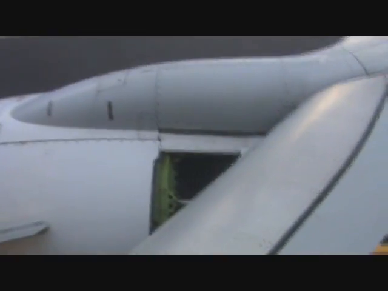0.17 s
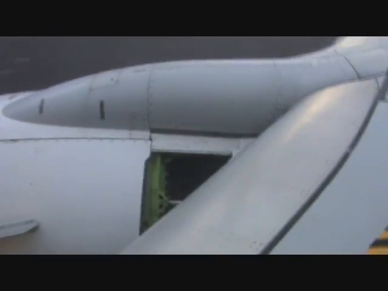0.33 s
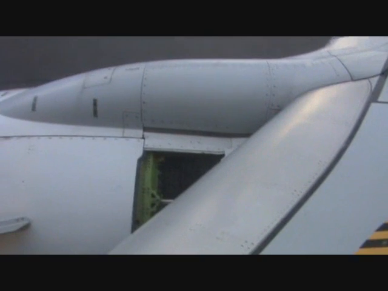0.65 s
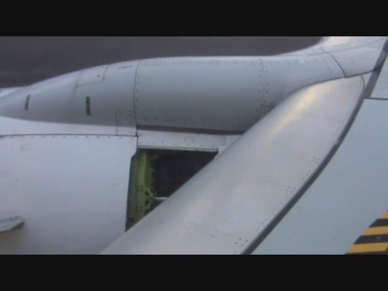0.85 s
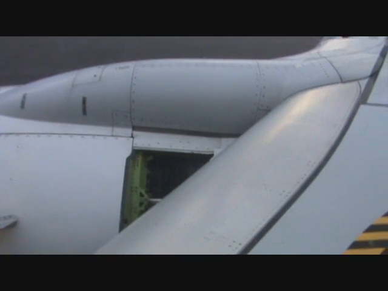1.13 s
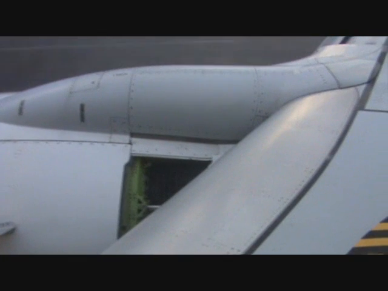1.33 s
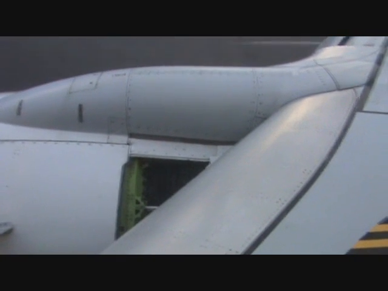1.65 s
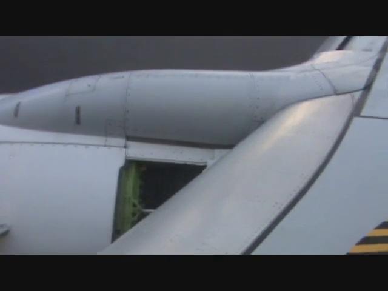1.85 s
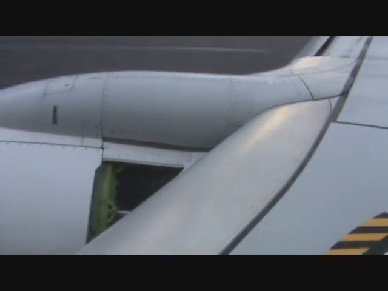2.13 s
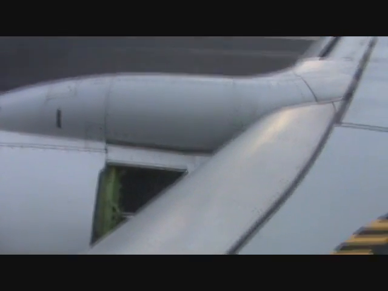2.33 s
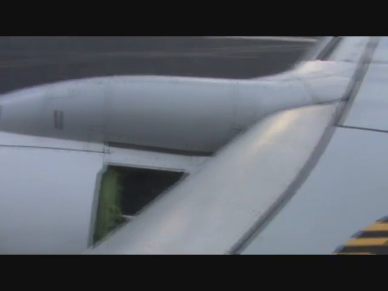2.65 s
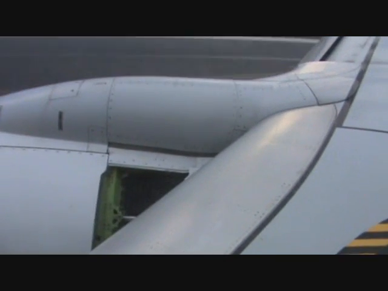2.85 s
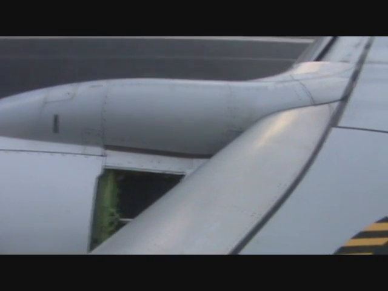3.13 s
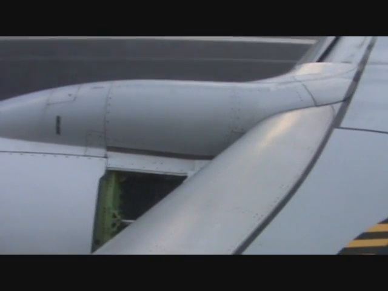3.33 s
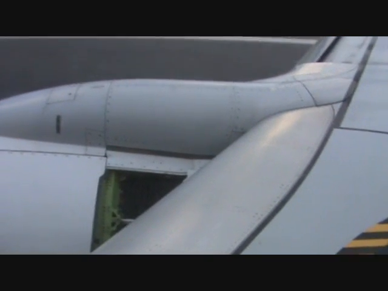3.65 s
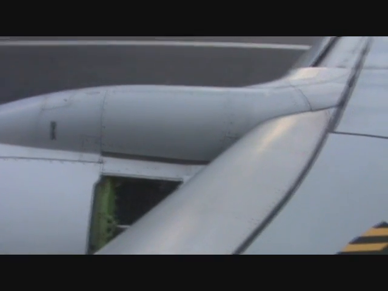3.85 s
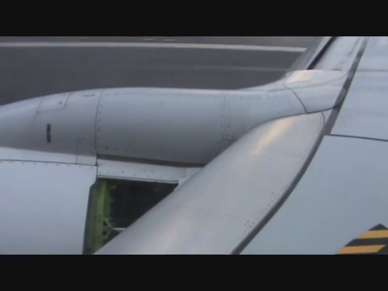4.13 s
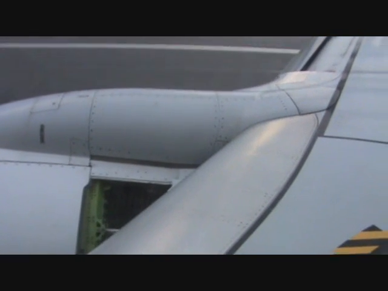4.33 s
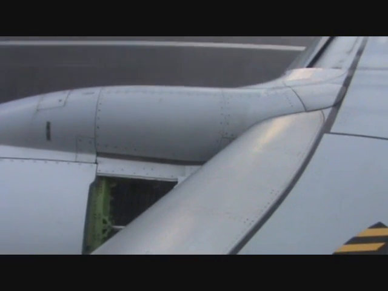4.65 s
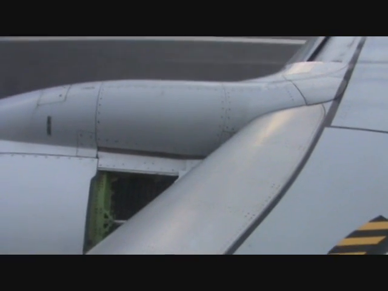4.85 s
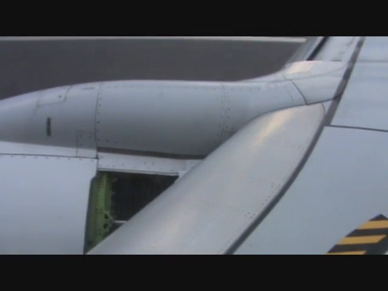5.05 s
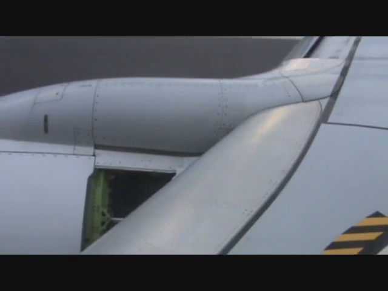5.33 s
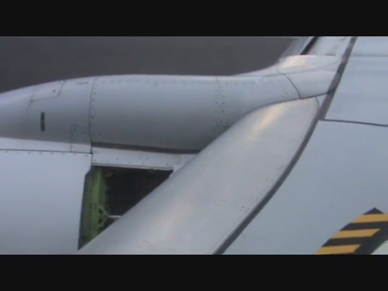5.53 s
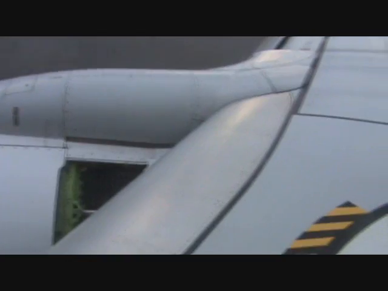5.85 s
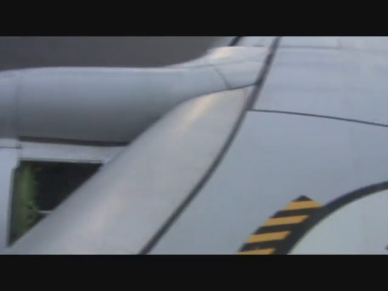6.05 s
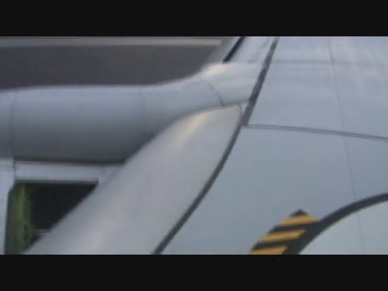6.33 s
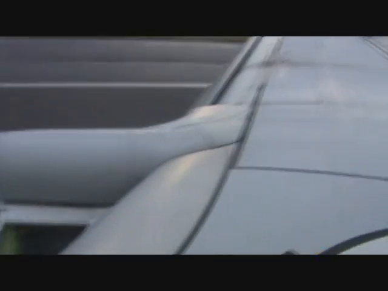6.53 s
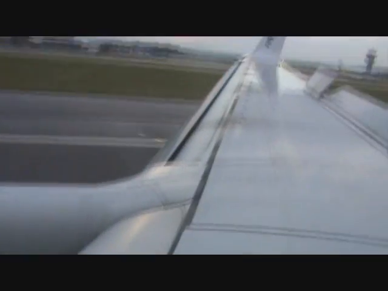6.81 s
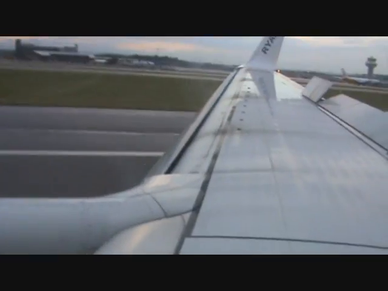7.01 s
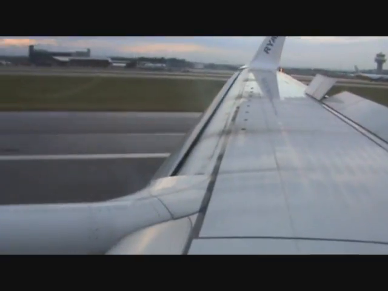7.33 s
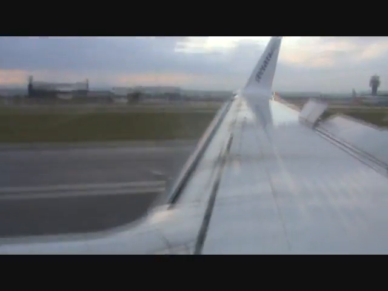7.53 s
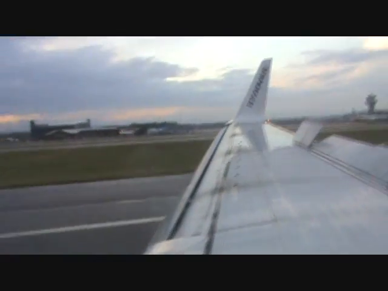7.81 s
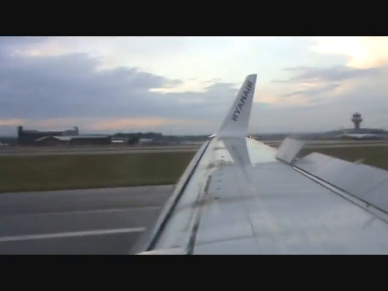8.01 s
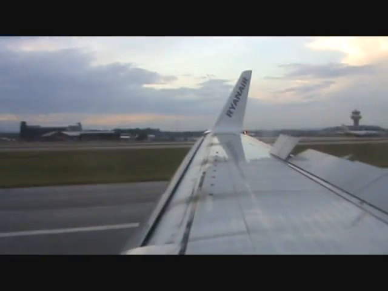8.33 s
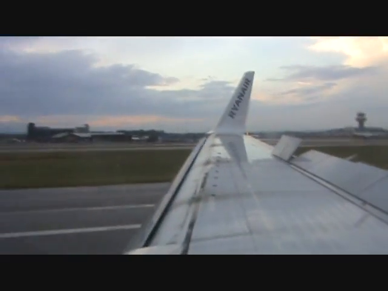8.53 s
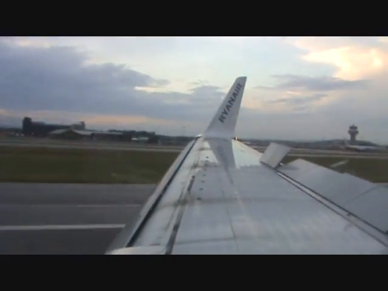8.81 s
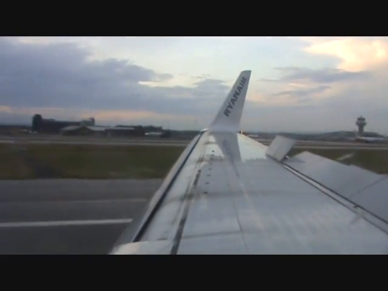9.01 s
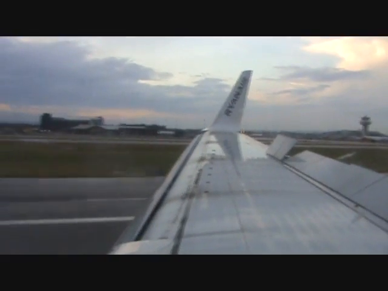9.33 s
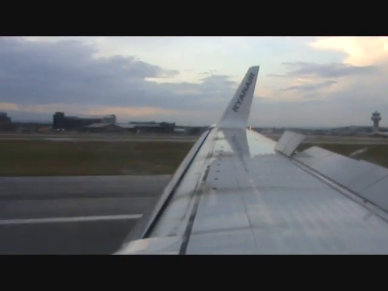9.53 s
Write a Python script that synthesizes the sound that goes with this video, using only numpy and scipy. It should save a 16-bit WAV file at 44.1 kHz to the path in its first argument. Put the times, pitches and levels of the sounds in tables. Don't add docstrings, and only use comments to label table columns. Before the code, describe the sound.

Deep, bassy aircraft roar with crackling bursts of taps and plastic rattles for six seconds, settling into a cleaner, steady rumble.

```python
import sys
import numpy as np
from scipy import signal
from scipy.fft import rfft, irfft
from scipy.io import wavfile
from scipy.ndimage import uniform_filter1d

SR = 44100
rng = np.random.default_rng(int(sys.argv[2]) if len(sys.argv) > 2 else 0)


def output_pcm(signal):
    pcm = np.clip(np.atleast_2d(signal).T, -1, 1) * 32767
    wavfile.write(sys.argv[1], SR, np.round(pcm).astype(np.int16))


def linear_from_db(decibels):
    return 10 ** (np.asarray(decibels, float) / 20)


N = 426447

# time in seconds, level in dB.
ENGINE_EFFORT = [
    (0.0, -28),
    (0.24, -28.5),
    (3.5, -34),
    (4.55, -33.5),
    (4.85, -35),
    (5.25, -33.5),
    (7.62, -35),
    (9.67, -33.5),
]
EFFORT_SHARES = [0.66, 0.71, 0.61]
# frequency in Hz, level in dB per Hz.
CABIN_SPECTRUM = [(15, -15.5), (30, -7), (60, -9.5), (110, -7), (200, -7), (345, -14), (550, -24.5),
                  (960, -34), (2000, -40), (3000, -49), (4500, -55), (7760, -63), (12000, -73),
                  (15600, -83)]
# frequency in Hz, width in Hz, boost in dB.
PANEL_MODES = [(145, 34.8, 11), (47.2, 15, 6), (91.6, 12, 3.5), (279, 32, 2.5), (324, 29, 4),
               (402, 70, 1.5), (3500, 560, 1), (6500, 930, 1.5), (1610, 340, 1), (3340, 940, 2)]
# time in seconds, level in dB.
PANE_BOOM = [(0, -18.5), (1.15, -14.5), (1.8, -19.5), (2.0, -17), (2.9, -23), (3.3, -18.5), (5.4, -22),
             (6.3, -20.5), (6.65, -19.5), (7.0, -20.5), (8.5, -21.5), (9.67, -20.5)]
# last swing back in seconds, number of cycles, frequency in Hz, level in dB.
JOLTS = [
    (1.4305, 5, 146, 2),
    (2.734, 4, 153, 0),
    (3.2826, 5, 145, 1),
    (3.7522, 3, 135, -3),
    (3.7735, 2, 139, 4),
    (4.377, 2, 150, 4),
]
# frequency in Hz, likeness 0 to 1, left lead in radians, left over right in dB.
MICROPHONE_PAIR = [(40, 0.97, -0.63, 3.0), (80, 0.97, -0.97, 1.8), (140, 0.99, -1.28, 1.0),
                   (220, 0.93, -1.41, 1.1), (330, 0.91, -1.4, 0.7), (480, 0.68, -1.79, 0.6),
                   (650, 0.55, -1.66, -0.2), (850, 0.57, -1.86, 0.0), (1100, 0.51, -1.39, 0.0),
                   (1500, 0.64, -0.66, -1.1), (2200, 0.72, -0.59, -1.3), (3200, 0.85, -0.17, -1.5),
                   (6000, 0.8, -0.16, -0.1), (12000, 0.71, -0.11, -0.0)]
# start in seconds, level in dB, ring in Hz, time to fall 60 dB in seconds.
RATTLES = [(0.292, -16, 4940, 0.033), (0.3475, -26, 4240, 0.055), (1.2017, -25.5, 6450, 0.066),
           (1.5464, -24, 4030, 0.067), (1.577, -22.5, 5940, 0.046), (1.828, -17, 5820, 0.026),
           (4.354, -50, 4340, 0.031), (6.681, -36, 4150, 0.04), (6.922, -25, 7700, 0.021),
           (7.4455, -45, 4410, 0.044), (7.5582, -33.5, 4380, 0.052), (7.879, -39, 5000, 0.015),
           (9.052, -40, 5000, 0.015), (6.247, -32, 5500, 0.04), (0.195, -29.5, 4230, 0.059),
           (8.2694, -34.5, 4300, 0.04)]
# time in seconds, push in dB.
KNOCKS = [(.149, -20), (.2654, -19), (.3744, -17), (.5739, -19), (1.6078, -20), (1.656, -19), (1.7126, -15),
          (1.8746, -20), (1.9421, -16), (2.3074, -20), (2.4161, -18), (2.4687, -18), (2.5442, -18),
          (3.1811, -14), (3.2266, -15), (3.5461, -15), (3.7228, -18), (3.8043, -20), (3.9086, -18),
          (3.9844, -19), (4.0656, -19), (4.2086, -20), (4.6322, -15), (4.6568, -20), (4.6748, -15),
          (5.174, -15), (5.3168, -17), (5.5029, -14), (5.5948, -18), (6.1005, -20)]
TOUCHES = [.2308, .3234, .4113, .5641, 2.4907, 2.5624, 2.9995, 3.2128, 3.4611, 3.523, 3.6668, 4.1457,
           4.3351, 4.3555, 4.4071, 4.469, 4.4983, 4.5826, 4.6134, 4.6882, 4.9393, 5.0817, 5.1967, 5.3476,
           5.4565, 5.49, 5.6728, 6.2408, 6.2648, 6.2893]
# first and last strike in seconds, first
# and last push in dB.
BURSTS = [(.3024, .3122, -19, -19), (1.3528, 1.3581, -14, -18), (1.4112, 1.416, -22, -19),
          (1.9795, 1.9887, -21, -15), (2.1097, 2.1155, -19, -15), (2.6767, 2.6838, -22, -21),
          (2.7205, 2.7276, -10, -20), (2.7415, 2.7494, -15, -13), (2.9326, 2.9383, -21, -16),
          (3.0636, 3.0742, -19, -18), (3.331, 3.3384, -21, -22), (3.7663, 3.7735, -10, -11),
          (3.8223, 3.8294, -21, -19), (3.9573, 3.9646, -17, -16), (4.265, 4.2716, -18, -20),
          (4.3703, 4.377, -20, -9), (4.5388, 4.5449, -23, -21), (4.9935, 4.9998, -18, -21),
          (5.4429, 5.4495, -22, -23), (5.5606, 5.567, -19, -20), (5.8832, 5.89, -21, -17),
          (5.9205, 5.9285, -21, -23),
          (.4327, .4754, -19, -21), (.5123, .5354, -19, -18), (1.4307, 1.4512, -17, -22),
         (1.7326, 1.7632, -23, -17), (1.9072, 1.9219, -19, -18), (3.0956, 3.1102, -18, -23),
         (3.2695, 3.289, -14, -18), (3.3522, 3.368, -16, -21), (3.5986, 3.63, -17, -21),
         (3.7371, 3.7522, -12, -14), (4.4414, 4.4528, -16, -20), (5.1439, 5.156, -20, -16),
         (5.2789, 5.2956, -21, -15), (5.4074, 5.4206, -17, -22), (5.8477, 5.8685, -18, -19),
         (5.954, 5.9685, -17, -21)]
# time in seconds, tick change in dB.
GRIP = [(0, 1.2), (2.0, -1), (2.3, -9.5), (2.7, -8.5), (2.72, -4.5), (2.74, -13.5), (3.0, -10),
        (3.28, -7.5), (3.33, -2), (5.6, -1.5), (5.85, -5), (6.3, -4)]
# time in seconds, left over right in dB.
LEAN = [
    (0, .2),
    (2.2, .2),
    (2.7, 2),
    (4.5, 1.6),
    (6, 2.6),
    (9.6, 0),
]
# frequency in Hz, level in dB.
CASING_RING = [(200, -4.5), (700, 8.5), (2000, -1.5), (4000, -16), (7000, -18.5), (10500, -23),
               (15000, -33)]

LIFT_S, LIFT_SPAN_S, LIFT_DB = 6.53, .4, -2.5
SWINGS_PER_S = 135
TOUCH_DB, UNEVEN_DB = -22.5, 2
TICK_DB, TICK_PER_DB, TICK_SPREAD_DB = -29, 0.95, -0.2
GRAZE_SHARE, GRAZE_DB, GRAZE_SPREAD_DB, GRAZE_TICK_DB = .5, -22.5, 4.0, -41
SETTLE_DB, SETTLE_S = -16, 0.34


def evened(x):
    return x / np.sqrt(np.mean(x ** 2) + 1e-20)


def read(points, hz, column=1):
    table = np.array(points)
    return np.interp(np.log(hz + 1), np.log(table[:, 0] + 1), table[:, column])


def add(mix, s, sound):
    part = mix[:, round(s * SR):][:, :sound.shape[1]]
    part += sound[:, :part.shape[1]]


def coloured(noise, points):
    hz = np.fft.rfftfreq(noise.shape[-1], 1 / SR)
    return evened(irfft(rfft(noise) * linear_from_db(read(points, hz)), noise.shape[-1]))


def roar_changes(hz, t, patchy_db=1.06, gusty_db=0.5, ragged_db=2.5):
    patches = rng.standard_normal((len(hz), len(t)))
    patches = uniform_filter1d(patches, size=14, axis=0)
    patches = evened(uniform_filter1d(patches, size=10, axis=1))
    gusts = evened(uniform_filter1d(rng.standard_normal(len(t)), size=4))

    boom_s, boom_db = np.transpose(PANE_BOOM)
    boom_db = np.interp(t, boom_s, boom_db - np.median(boom_db))
    effort_s, effort_db = np.transpose(ENGINE_EFFORT)
    effort_db = np.interp(t, effort_s, effort_db - np.median(effort_db))
    change_db = np.array([boom_db] + [share * effort_db for share in EFFORT_SHARES])
    change_db[3] += LIFT_DB * np.clip((t - LIFT_S) / LIFT_SPAN_S + .5, 0, 1)

    centres = np.log([160, 280, 1000, 3000])
    shares = np.array([np.interp(np.log(hz + 1), centres, row) for row in np.eye(4)])
    shares[3] *= read([(3500, 1), (6000, 0.18), (12000, 0.21)], hz)
    high = 1 - shares[:2].sum(0)[:, None]
    patch_db = patchy_db + ragged_db * np.clip(hz / 5000 - 2, 0, 1)[:, None]
    return shares.T @ change_db + high * (patch_db * patches + gusty_db * gusts)


def roar():
    frames, hz = N // 256 + 5, np.fft.rfftfreq(1024, 1 / SR)
    t = np.arange(frames) * 256 / SR
    real, imaginary = rng.standard_normal((2, 2, len(hz), frames))
    field = (real + 1j * imaginary) * linear_from_db(roar_changes(hz, t))
    left, other = rfft(signal.istft(field, nperseg=1024, noverlap=768)[1][:, :N])

    hz = np.fft.rfftfreq(N, 1 / SR)
    colour_db = read(CABIN_SPECTRUM, hz)
    for mode_hz, width_hz, db in PANEL_MODES:
        colour_db = colour_db + db / (1 + (2 * (hz - mode_hz) / width_hz) ** 2)
    colour_db += 5.5 / (1 + ((hz - 2930) / 110) ** 2)
    colour_db -= 16 / (1 + np.exp((15050 - hz) / 60))

    same, lead, lean_db = (read(MICROPHONE_PAIR, hz, column=k) for k in (1, 2, 3))
    same = np.clip(same, 0, 1)
    right = (same * left + np.sqrt(1 - same ** 2) * other) * np.exp(-1j * lead)
    pair = np.array([left * linear_from_db(lean_db / 2), right / linear_from_db(lean_db / 2)])
    return linear_from_db(-11.0) * evened(irfft(pair * linear_from_db(colour_db), N))


def rattles():
    t, out = np.arange(4096) / SR, np.zeros((2, N))
    for s, db, hz, t60 in RATTLES:
        colour = [(500, -22), (2000, -6), (0.98 * hz, -9), (hz, 0), (1.1 * hz, -11), (11000, -19), (15000, -38)]
        buzz = coloured(rng.standard_normal((3, len(t))), colour)
        fade = linear_from_db(db - 8.0 - 60 * t / max(t60, .005)) * (1 - np.exp(-t / 0.001))
        add(out, s, fade * (buzz[0] + .5 * buzz[1:]))
    return out


def strikes():
    rows = KNOCKS + [(s, TOUCH_DB) for s in TOUCHES]
    for first, last, first_db, last_db in BURSTS:
        count = round((last - first) * SWINGS_PER_S) + 1
        rows = rows + list(zip(np.linspace(first, last, count), np.linspace(first_db, last_db, count)))
    s, push_db = np.transpose(rows)
    wobble, dull = rng.standard_normal((len(s), 2)).T
    push_db = push_db + UNEVEN_DB * wobble * (push_db < -17.5)
    tick_db = TICK_DB + TICK_PER_DB * (push_db + 19)
    tick_db = tick_db + np.interp(s, *np.transpose(GRIP)) + TICK_SPREAD_DB * dull
    return np.transpose([s, push_db, tick_db])


def grazes(hits):
    pick, when, size, bright = rng.random((len(hits), 4)).T
    side = np.where(when < .5, -1, 1)
    s = hits[:, 0] + side * (.35 + 2.4 * abs(when - .5)) / SWINGS_PER_S
    push_db = GRAZE_DB + GRAZE_SPREAD_DB * np.log(size + .02)
    tick_db = GRAZE_TICK_DB + 12 * (bright - .5)
    return np.transpose([s, push_db, tick_db])[pick < GRAZE_SHARE]


def swings(hits):
    out = np.zeros((2, N))
    nudges = [(s, 1, PANEL_MODES[0][0], 0.8 * push_db - 1.5) for s, push_db, _ in hits]
    for s, cycles, hz, db in nudges + JOLTS:
        t = np.arange(-cycles / hz, 0.88 / hz, 1 / SR)
        turn = 2 * np.pi * hz * (t - np.array([[.0008], [.0005]]))
        uneven = .6 * np.sin(.37 * turn) + .3 * np.sin(2.3 * turn + np.array([[0], [1.5]]))
        swing = uneven * np.cos(turn) - np.sin(turn)
        add(out, s + t[0], linear_from_db(db) * swing * signal.windows.tukey(len(t), min(2 / cycles, 1)))
    return out


def chatter(hits, per_s=700, spread_db=1.0):
    shake = np.zeros(N)
    s, push_db, _ = hits.T
    shake[(s * SR).astype(int)] = linear_from_db(push_db)
    shake = signal.lfilter([1], [1, -np.exp(-1 / (0.01 * SR))], shake)
    shake = shake + linear_from_db(SETTLE_DB) * np.exp(-(np.arange(N) / (SETTLE_S * SR)) ** 2)
    sizes = linear_from_db(spread_db * np.minimum(rng.exponential(1, (2, N)), 4))
    touches = (rng.random((2, N)) < per_s / SR) * sizes
    t = np.arange(200) / SR
    touch = np.sin(2 * np.pi * 2600 * t) * np.exp(-t / 0.000088)
    both_sides = touches + 0.11 * touches[::-1]
    return linear_from_db(-9.5) * signal.oaconvolve(shake * both_sides, touch[None])[:, :N]


def taps(hits):
    t, out = np.arange(1024) / SR, np.zeros((2, N))
    chance = rng.random((len(hits), 4))
    rings = coloured(rng.standard_normal((len(hits), 3, len(t))), CASING_RING)
    for (s, push_db, tick_db), (wide, pitch, blunt, skew), ring in zip(hits, chance, rings):
        side = linear_from_db(np.interp(s, *np.transpose(LEAN)) * np.array([[.5], [-.5]]))
        u = t / (np.array([[.00046], [.00034]]) * (.85 + .3 * wide))
        rise_s = 2.3e-5 * linear_from_db(-.62 * (tick_db + 21) + 2 * blunt)
        push = (1 - np.exp(-(t / rise_s) ** 2)) * (1 - .5 * u) * np.exp(-u)
        turn = 2 * np.pi * 10500 * (0.921 + .08 * pitch) * t + np.array([[0], [1.9 * (skew - .3)]])
        tick = np.sin(turn) * linear_from_db(-60 * t / 0.0023) * (1 - np.exp(-t / 7e-5))
        after = (ring[0] + 0.4 * ring[1:]) * linear_from_db(-60 * t / 0.03 - 4) * (1 - np.exp(-t / 0.0006))
        thump = side * linear_from_db(push_db + 9.0) * (push + linear_from_db(-14.5) * after)
        add(out, s, thump + linear_from_db(tick_db + 6.5) * tick)
    return signal.sosfilt(signal.butter(1, 15000, fs=SR, output="sos"), out)


def capsules(pressure, cut_hz=120, choke=0.43):
    limit, knee, split_hz = .4, 5, 1200
    bass = signal.sosfiltfilt(signal.butter(2, split_hz, fs=SR, output="sos"), pressure)
    squeeze = (1 + abs(bass / limit) ** knee) ** (-1 / knee)
    flattened = bass * squeeze + (pressure - bass) * squeeze ** (knee * choke)
    return signal.sosfilt(signal.butter(1, cut_hz, "high", fs=SR, output="sos"), flattened)


def scene():
    engines, hits = roar(), strikes()
    casing = taps(hits) + taps(grazes(hits)) + chatter(hits) + rattles()
    return linear_from_db([[1.5], [1.1]]) * capsules(engines + swings(hits)) + casing


def top_cut(x):
    return signal.sosfilt(signal.butter(12, 15710, fs=SR, output="sos"), x)


def record(dry):
    rounded = dry / (1 + abs(dry / .97) ** 6) ** (1 / 6)
    return top_cut(rounded)


dry = scene()
out = record(dry)
output_pcm(out)
```